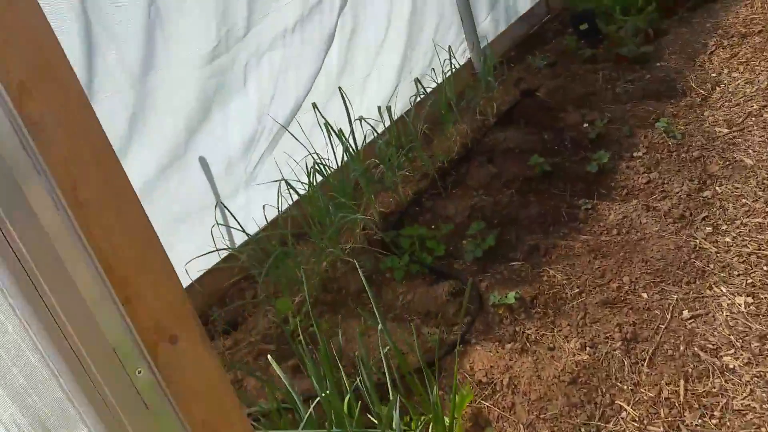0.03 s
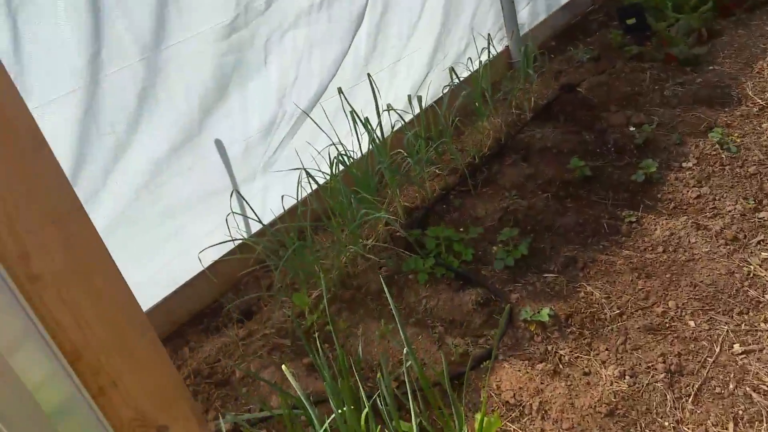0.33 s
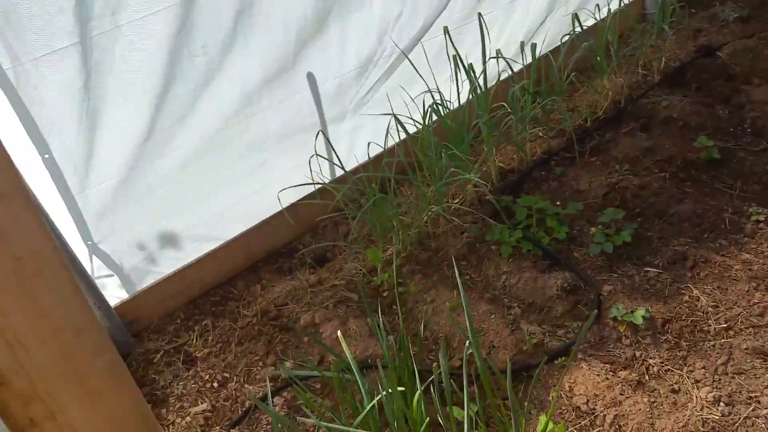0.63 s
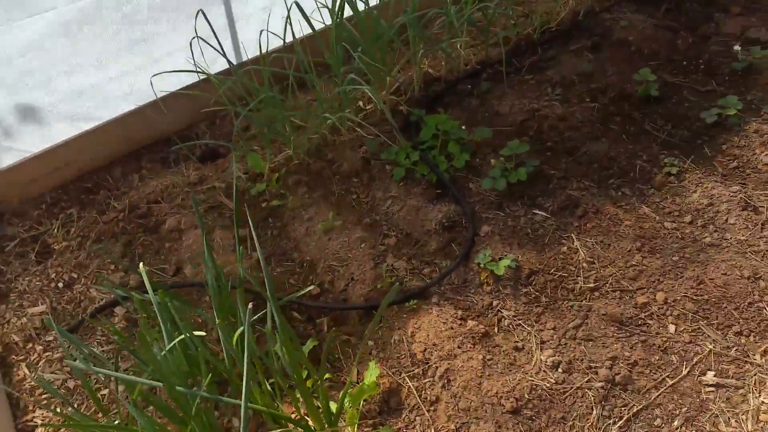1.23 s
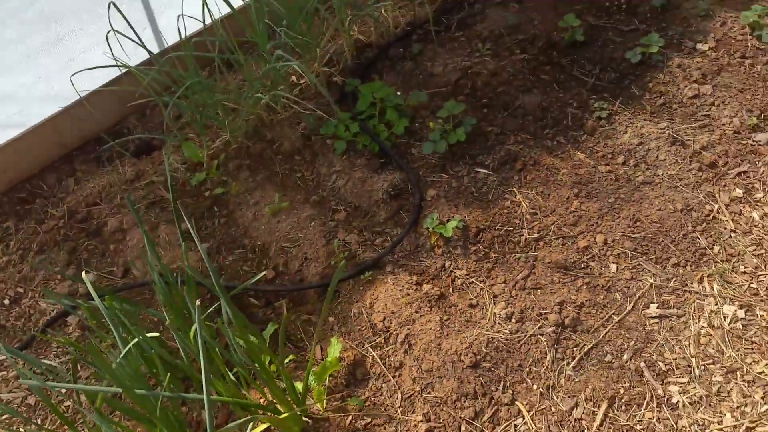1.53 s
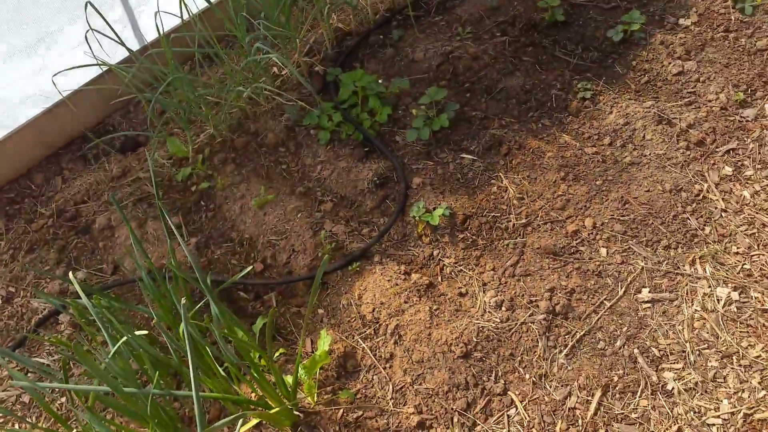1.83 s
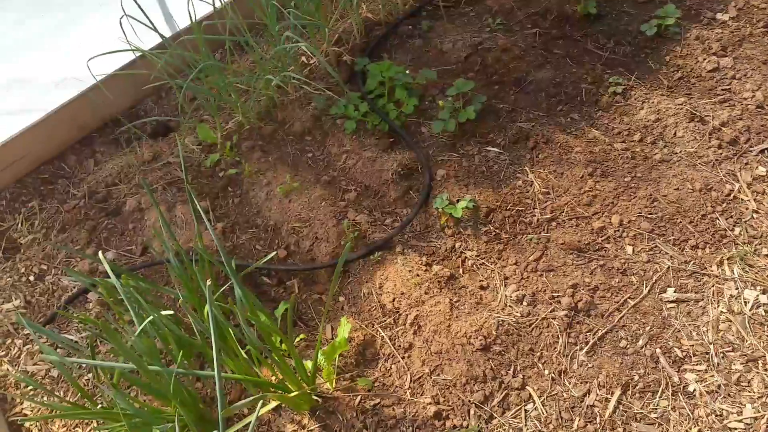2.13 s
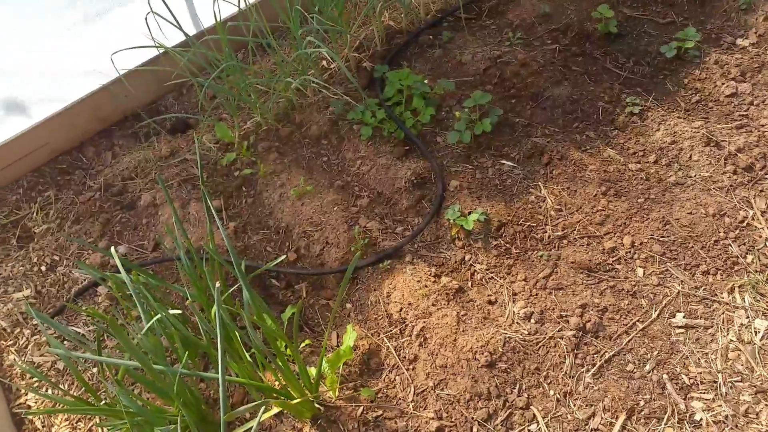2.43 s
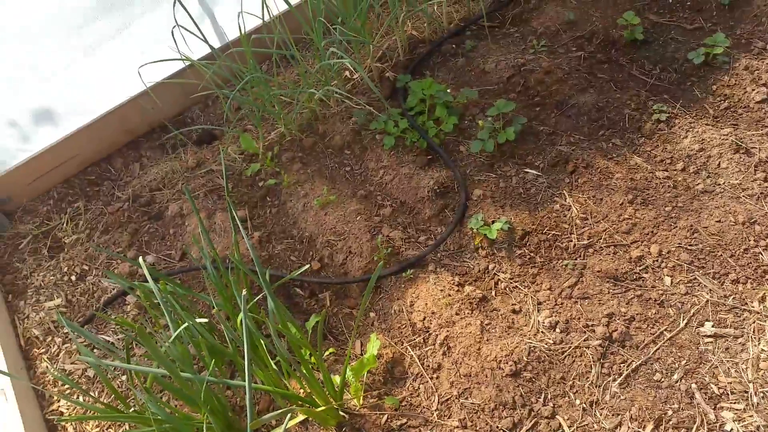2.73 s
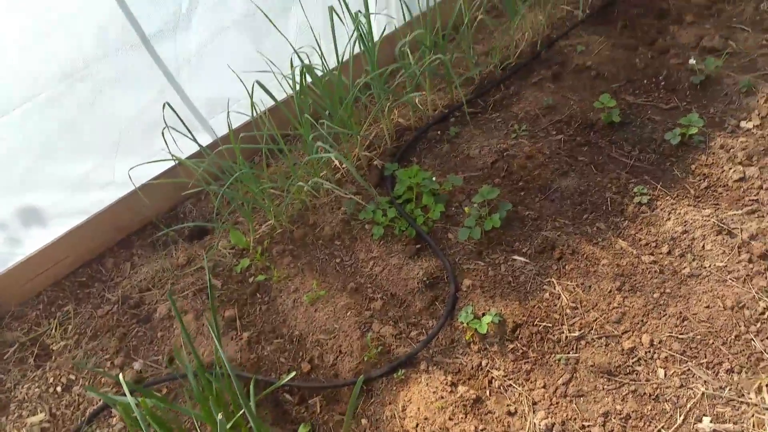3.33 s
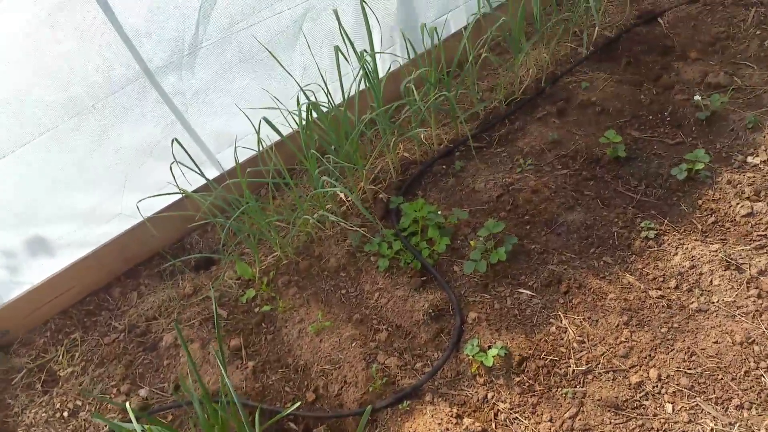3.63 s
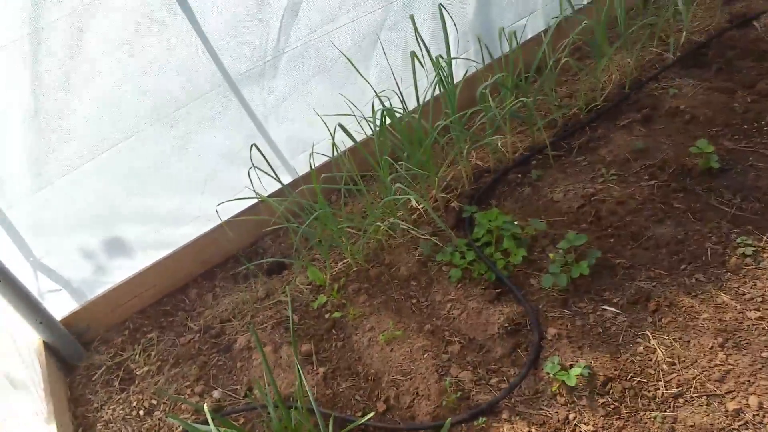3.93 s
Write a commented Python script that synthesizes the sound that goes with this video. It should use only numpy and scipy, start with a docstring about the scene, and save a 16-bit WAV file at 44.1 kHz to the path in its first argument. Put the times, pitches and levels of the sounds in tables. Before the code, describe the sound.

A fan hums in a greenhouse, with light rustles, ticks and one crunching step.

```python
"""Inside a plastic greenhouse a fan hums throughout over a steady wash of air.
At the start a small bird whistles a thin, very high phrase on the left, and air buffets the microphone.
Someone shifts about with it: clothes swish by friction, dry stalks and plastic tick, leaves scrape.
Near three seconds one step crunches down, the mulch giving way in many small fractures.
The bird then gives a second, higher phrase among the last ticks and swishes."""
import sys
import numpy as np
from scipy import signal
from scipy.fft import rfft, irfft
from scipy.io import wavfile

SR = 44100
rng = np.random.default_rng(int(sys.argv[2]) if len(sys.argv) > 2 else 0)


def log_audio(samples):
    """Write samples as a 16-bit WAV file to the path given in sys.argv[1]."""
    # one column per channel
    frames = np.atleast_2d(samples).T
    # limit to full scale, then quantise
    limited = np.clip(frames, -1, 1)
    pcm = np.round(limited * 32767).astype(np.int16)
    wavfile.write(sys.argv[1], SR, pcm)


N = 176400
T = np.arange(N) / SR
HZ = np.maximum(np.arange(N // 2 + 1) * SR / N, 1)


def from_db(db):
    """Amplitude grows tenfold for every 20 dB."""
    return 10 ** (np.asarray(db) / 20)


def rms_one(x):
    """Dividing by the root mean square gives unit power."""
    return x / np.sqrt(np.mean(x ** 2) + 1e-20)


def at_hz(points):
    """Interpolation on a logarithmic frequency axis turns (Hz, value) points into a spectrum."""
    hz, value = np.transpose(points)
    return np.interp(np.log(HZ), np.log(hz), value)


def drift(rate_hz):
    """Low-passed noise is a smooth random fluctuation, here of unit power."""
    return rms_one(irfft(rfft(rng.standard_normal(N)) / (1 + (HZ / rate_hz) ** 4), N))


def band(x, low_hz, high_hz):
    """A causal band-pass filter attenuates what lies outside its two edges."""
    return signal.sosfilt(signal.butter(2, [low_hz, high_hz], "band", fs=SR, output="sos"), x)


def delayed(x, seconds):
    """Propagation delay: a longer path brings the same wave later."""
    n = np.arange(len(x))
    return np.interp(n - seconds * SR, n, x, left=0)


def add(out, start_s, sound):
    """Superposition: a stereo sound adds to the pressure already there."""
    i = max(int(start_s * SR), 0)
    out[:, i:i + sound.shape[1]] += sound[:, :N - i]


def diffuse(pair, spectrum_db):
    """In a diffuse field two microphones agree on long waves only; the result has unit power."""
    # Each row: frequency in Hz, left-right likeness (a correlation once clipped).
    likeness = [(50, 3.5), (130, .96), (290, 0.92), (640, 0.33), (1400, -0.22), (3100, 0), (15000, 0)]
    correlation = np.clip(at_hz(likeness), -.99, .99)
    mid, side = rfft(pair) * from_db(spectrum_db)
    spectra = np.sqrt(1 + correlation) * mid + np.sqrt(1 - correlation) * side * [[1], [-1]]
    return rms_one(irfft(spectra, N))


def grains(per_s, spread_db):
    """Shot noise: two streams of independent clicks of uneven size."""
    sizes = from_db(spread_db * np.minimum(rng.exponential(1, (2, N)), 5))
    return rms_one(sizes * rng.choice([-1, 1], (2, N)) * (rng.random((2, N)) < per_s / SR))


def swell(peak_s, rise_s, fall_s):
    """An envelope with a Gaussian rise and an exponential decay."""
    return np.exp(-(np.minimum(T - peak_s, 0) / rise_s) ** 2 - np.maximum(T - peak_s, 0) / fall_s)


def air():
    """Turbulence makes a broadband wash, and low buffets where the microphone moves through the air."""
    # Each row of both spectra: frequency in Hz, relative spectral density in dB.
    wash_spectrum = [(14, -37), (50, -10.5), (90, 0.5), (160, 5), (220, -1), (330, -1), (460, -6),
                     (660, -9.5), (790, -4.5), (950, -10.5), (1600, -13), (3000, -20.5), (5400, -24.5),
                     (6800, -37), (11000, -38), (16000, -44.5)]
    buffet_spectrum = [(20, 16), (42, -13.5), (90, 11), (200, -6), (400, -32.5), (1000, -46.5)]
    # Each row: peak time in seconds, level in dB, rise and fall in seconds, left minus right in dB.
    buffets = [(0.03, -24.5, 0.3, 0.084, -16), (2.98, -35.5, 0.14, 0.35, -1)]
    wash = diffuse(rng.standard_normal((2, N)), at_hz(wash_spectrum))
    wash *= from_db(-45 + .5 * drift(4.8)) / band(wash, 280, 16000).std()  # level set above 280 Hz
    gusts = sum(from_db([[db + pan / 2], [db - pan / 2]]) * swell(s, rise, fall)
                for s, db, rise, fall, pan in buffets)
    return wash + gusts * diffuse(rng.standard_normal((2, N)), at_hz(buffet_spectrum))


def fan():
    """Periodic motion radiates a tone: a nearly pure, slightly wavering hum with a faint octave."""
    hum_hz, hum_db, octave_db = 125.2, -30.5, -31.5
    waver_hz, waver_db = .25, .7
    phase = 2 * np.pi * np.cumsum(hum_hz + waver_hz * drift(9.8)) / SR
    amplitude = np.sqrt(2) * from_db(hum_db + waver_db * drift(25.0))
    return amplitude * (np.sin(phase) + from_db(octave_db) * np.sin(2 * phase))


def crackle():
    """Dry mulch settling underfoot releases faint noise bursts at random, each decaying exponentially."""
    # Each row: frequency in Hz, relative spectral density in dB.
    spectrum = [(500, -18), (1500, 20), (3500, -1), (5500, -8), (7000, -32), (15000, -42)]
    level_db, decay_s = -56.5, 0.0033
    impulses = np.abs(grains(per_s=15, spread_db=2.5)[0]) + 1e-18
    bursts = signal.lfilter([1], [1, -np.exp(-1 / (decay_s * SR))], impulses)
    return from_db(level_db) * diffuse(bursts * rng.standard_normal((2, N)), at_hz(spectrum))


def clothes():
    """Friction of cloth makes very fine clicks that merge into a swish with each movement."""
    # Each row: peak time in seconds, level in dB, rise and fall in seconds, tilt in dB per octave.
    swishes = [(0.234, -39, 0.048, 0.12, -1.5), (0.349, -34, 0.019, 0.033, 1),
               (.58, -42.5, 0.064, 0.15, -2), (1.12, -47.5, 0.36, 0.33, -1.5),
               (1.451, -30, 0.011, 0.0056, 3), (1.49, -45, 0.066, 0.073, 0),
               (2.22, -42.5, 0.06, 0.089, 0.5), (2.69, -44.5, 0.066, 0.086, -2),
               (3.62, -41, 0.082, 0.081, -6.5), (3.95, -51, 0.19, 0.072, 1.5)]
    # Each row: frequency in Hz, relative spectral density in dB.
    spectrum = [(200, -33), (500, -5), (1000, -0.5), (2200, -4.5), (4000, -9.5), (5500, -14), (6800, -31),
                (11000, -33), (16000, -38)]
    fibres = grains(per_s=14000, spread_db=-2.0)
    octaves = np.log2(HZ / 1000)
    return sum(from_db(db) * swell(s, rise, fall) * diffuse(fibres, at_hz(spectrum) + tilt * octaves)
               for s, db, rise, fall, tilt in swishes)


def scrapes():
    """Sliding friction between dry leaves briefly excites one broad resonance."""
    # Each row: peak time in seconds, level in dB, centre in Hz, rise and fall time in seconds.
    slides = [(1.372, -41.5, 3200, 0.007), (1.68, -41.5, 2620, 0.0079), (2.852, -31.5, 2920, 0.0068),
              (2.945, -32.5, 2760, 0.0074), (2.978, -26.5, 2670, 0.0072), (3.609, -33, 2000, 0.0088),
              (3.69, -40.5, 2850, 0.018), (3.933, -41.5, 3540, 0.0055), (3.975, -42.5, 3130, 0.014)]
    width_octaves, lift_db = 0.77, 35
    fibres = grains(per_s=3400, spread_db=-2.0)
    out = np.zeros((2, N))
    for s, db, hz, slope_s in slides:
        resonance_db = lift_db * np.exp(-.5 * (np.log2(HZ / hz) / width_octaves) ** 2)
        out += from_db(db) * swell(s, slope_s, slope_s) * diffuse(fibres, resonance_db)
    return out


def bird():
    """Gliding whistles, made raspy by frequency modulation, are smeared by reflections from the walls."""
    # Each row: start and length in seconds, level in dB, first and last pitch in Hz, rasp depth in Hz.
    syllables = [(.008, 0.01, -43, 9450, 9470, 190), (0.04, 0.0046, -42.5, 9350, 9600, 190),
                 (0.094, .018, -47, 9700, 9000, 170), (0.142, 0.018, -47, 9700, 9050, 130),
                 (0.157, 0.023, -39.5, 9520, 9280, 40), (0.175, 0.027, -47, 9200, 9470, 40),
                 (0.191, 0.024, -56, 9380, 9420, 80), (0.215, 0.085, -67.5, 9620, 9540, 70),
                 (3.539, 0.0048, -42, 9800, 9900, 190), (3.595, 0.029, -42, 11700, 11520, 50.5),
                 (3.659, 0.017, -49, 11620, 11460, 59.7), (3.681, 0.025, -39.5, 11710, 11450, 60.3),
                 (3.742, 0.033, -46, 11560, 11650, 30)]
    echo_db, echo_decay_s, pan_db = -5.5, 0.042, 1
    song, wobble = np.zeros(N), drift(520)
    for s, length, db, start_hz, end_hz, rasp_hz in syllables:
        progress = np.clip((T - s) / length, 0, 1)
        pitch_hz = start_hz + (end_hz - start_hz) * progress + rasp_hz * wobble
        phase = 2 * np.pi * np.cumsum(pitch_hz) / SR
        song += from_db(db) * np.sin(np.pi * progress) * np.sin(phase) * np.sqrt(2)
    t = T[:SR // 4]
    walls = rng.standard_normal((2, len(t))) * np.exp(-t / echo_decay_s)
    echo = signal.fftconvolve(song[None], rms_one(walls) / np.sqrt(len(t)), axes=1)[:, :N]
    return (song + from_db(echo_db) * echo) * from_db([[pan_db], [-pan_db]])


def knocks():
    """Each impact of hand, foot or wood rings one heavily damped mode."""
    # Each row: start in seconds, level in dB, pitch in Hz, decay time in seconds.
    impacts = [(.015, -23.5, 190, 0.0095), (0.083, -22.5, 363, 0.0044), (0.088, -25.5, 198, .012),
               (0.869, -18.5, 169, 0.0083), (1.4392, -7.5, 1070, 0.0011), (2.8452, -3.5, 1830, 0.00088),
               (2.978, -15, 329, 0.012), (2.978, -19, 635, 0.0097), (3.25, -25, 438, 0.0046)]
    rise_s, right_lag_s = 0.00052, 0.00013
    out, t = np.zeros((2, N)), T[:SR // 5]
    for s, db, hz, decay_s in impacts:
        envelope = from_db(db) * np.exp(-t / decay_s) * (1 - np.exp(-t / rise_s))
        ring = band(envelope * np.sin(2 * np.pi * hz * t), hz / 2, 16000)
        add(out, s, np.array([ring, delayed(ring, right_lag_s)]))
    return out


def ticks():
    """Brittle fracture in stalks and plastic: a faint creak, a crack with a bright snap, then a tail."""
    # Each row: time in seconds, level in dB, body and snap trims in dB, pitch in Hz, crack tail in dB.
    fractures = [(0.0822, -38, 6.5, -25, 2800, -11.5), (0.8866, -39.5, 4.5, -4.5, 2860, -8.5),
                 (1.0213, -30.5, -20, -20, 4200, -13), (1.0287, -23, -7, -16.5, 5400, -26),
                 (1.0779, -39, -3, -27, 3780, -12), (1.128, -40, 5, -15, 3550, -5),
                 (1.16, -29, -2.5, -14, 4600, -12), (1.2715, -35, -12, -20, 3640, -7),
                 (1.2815, -28, -15, -12, 4260, -12), (1.4044, -31.5, -16, -8.5, 3640, -13),
                 (1.4378, -27, 1, -7.5, 2400, -16), (1.516, -30, -0.5, -11, 3450, -15),
                 (2.1405, -26, -10, -9.5, 3850, -16), (2.621, -41, 6, -14, 3570, -14),
                 (2.846, -26.5, -12, -24, 2370, -5), (2.8882, -32.5, 11, -20, 1920, -8),
                 (2.9115, -26.5, -7, -8, 3040, -7.5), (2.9372, -26, -22, -2, 4440, -1.5),
                 (2.978, -27, -13, -37, 2680, -12), (2.9969, -28.5, -8, -6, 2320, -12),
                 (3.1032, -41.5, -1, 0.5, 2900, -13), (3.1166, -32.5, -2, -6.5, 1990, -7),
                 (3.185, -32, -5, -14, 2100, -9), (3.2526, -42, 9.5, -4.5, 1920, -6),
                 (3.477, -34, -18, -18, 2240, -8), (3.5265, -34.5, 3, -4, 2560, -13),
                 (3.539, -32, -19, -8, 2330, -10), (3.5936, -20, -5.5, -5.5, 3860, -5.5),
                 (3.7644, -33, -13, -27, 2100, -5), (3.7887, -26, -8, -3, 4260, -10),
                 (3.845, -38, -6, -11, 3240, -14)]
    rise_s, crack_decay_s, snap_decay_s = 0.0009, 0.0029, 0.0011
    top_hz, ring_half_width_hz, snap_tail_db = 5490, 580, -23.5
    right_lag_s, correlation, pan_db = 0.00054, 0.41, 1.5  # the ticks come from the left
    crack_lowpass = signal.butter(7, 7240, fs=SR, output="sos")  # the snap lies above this edge
    out, lead_s = np.zeros((2, N)), 0.02
    t = T[:SR // 5] - lead_s
    after = np.maximum(t, 0)
    onset = 1 - np.exp(-after / rise_s)
    creak = from_db(-28) * np.exp(-np.abs(t) / 0.0047)  # a stalk bends just before it snaps
    tail = np.exp(-after / 0.019)  # the greenhouse reverberates
    for s, db, body_db, snap_db, hz, tail_db in fractures:
        left, unrelated = rng.standard_normal((2, len(t)))
        right = correlation * delayed(left, right_lag_s) + np.sqrt(1 - correlation ** 2) * unrelated
        noise = np.array([left, right])
        burst = from_db(-4.5) * rms_one(band(band(noise, 0.41 * hz, top_hz), 610, top_hz))
        ring = from_db(-6) * rms_one(band(noise[::-1], hz - ring_half_width_hz, hz + ring_half_width_hz))
        body = from_db(body_db - 1) * rms_one(band(noise, 323, 1170))
        crack = signal.sosfilt(crack_lowpass, burst + ring + body)
        crack *= creak + onset * (np.exp(-after / crack_decay_s) + from_db(tail_db) * tail)
        snap = from_db(snap_db + 5.5) * rms_one(band(noise, 8200, 14300))
        snap *= onset * (np.exp(-after / snap_decay_s) + from_db(snap_tail_db) * tail)
        add(out, s - lead_s, from_db(db) * (crack + snap))
    return out * from_db([[pan_db], [-pan_db]])


def jolts():
    """The landing foot sends out two pressure pulses that reach the left microphone first."""
    # Each row: peak time in seconds, level before filtering in dB, half width in seconds.
    pulses = [(2.9785, -8, 0.00025), (2.9821, -6, 0.00012)]
    band_hz, right_lag_s = [171, 4000], 0.00021
    push = sum(from_db(db) * np.exp(-np.abs(T - s) / half_s) for s, db, half_s in pulses)
    push = signal.sosfilt(signal.butter(1, band_hz, "band", fs=SR, output="sos"), push + 1e-18)
    return np.array([push, delayed(push, right_lag_s)])


def step():
    """Under the foot, soil and mulch give way in dense small fractures that excite hollow resonances."""
    # Each row: time in seconds, level in dB.
    contour = [(2.8, -49), (2.843, -31), (2.858, -24), (2.872, -31.5), (2.885, -31), (2.891, -21.5),
               (2.92, -27.5), (2.965, -23.5), (2.982, -22.5), (3.01, -27), (3.1, -32), (3.18, -32),
               (3.22, -40.5), (3.3, -41), (3.48, -54)]
    # Each row: frequency in Hz, relative spectral density in dB.
    spectrum = [(15, -42), (45, -22), (100, -4.5), (170, -1.5), (480, -7.5), (1100, -10), (1500, -14),
                (3200, -21.5), (5000, -25), (6800, -44), (16000, -52)]
    # Each row: resonance frequency in Hz, width in Hz, lift in dB.
    hollows = [(177, 22, 6), (341, 23, 7.5), (616, 18, 4)]
    times, levels_db = np.transpose(contour)
    envelope = from_db(np.interp(T, times, levels_db, left=-120, right=-120))
    resonances_db = sum(lift / (1 + (2 * (HZ - hz) / width) ** 2) for hz, width, lift in hollows)
    return envelope * diffuse(grains(per_s=2500, spread_db=2.5), at_hz(spectrum) + resonances_db)


def scene():
    """The pressures of all sources superpose at the two microphones."""
    return (fan() + air() + clothes() + step() + jolts()
            + crackle() + scrapes() + ticks() + knocks() + bird())


def record(dry):
    """Frequency response: the right microphone is weaker and duller, and both lose the highest treble."""
    # Each row: frequency in Hz, left minus right in dB.
    balance = [(50, 14), (125, 3), (350, 2), (700, -.5), (1300, -.5), (2400, 7), (4400, -1), (8000, 11),
               (15000, 5)]
    cutoff_hz = 16200
    mirrored = np.hstack([dry, dry[:, ::-1]])  # keeps the end from wrapping into the start
    gains = from_db(np.repeat(at_hz(balance), 2)[:N + 1] * np.array([[.5], [-.5]]))
    coloured = irfft(rfft(mirrored) * gains)[:, :N]
    return signal.sosfilt(signal.ellip(10, .1, 80, cutoff_hz, fs=SR, output="sos"), coloured)


dry = scene()
out = record(dry)
log_audio(out)
```